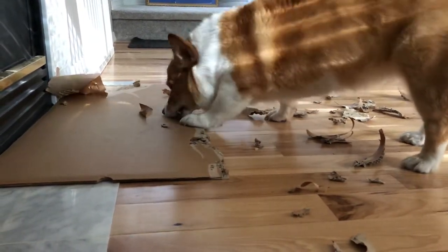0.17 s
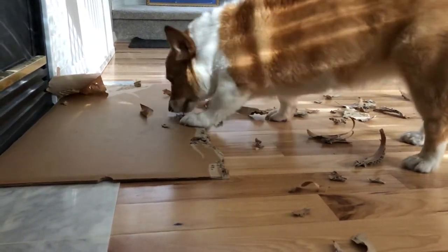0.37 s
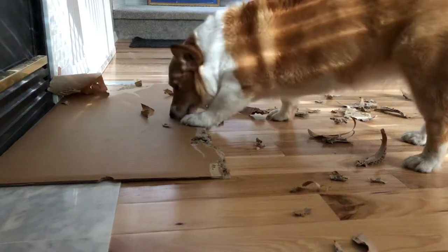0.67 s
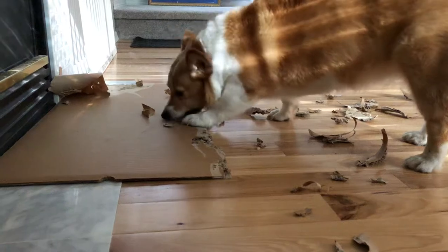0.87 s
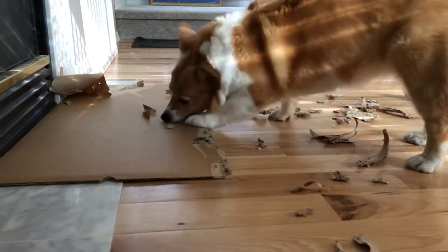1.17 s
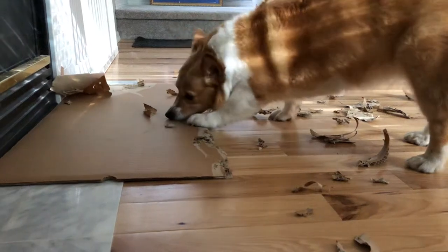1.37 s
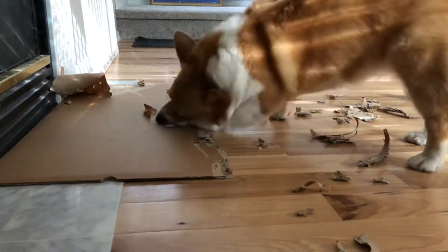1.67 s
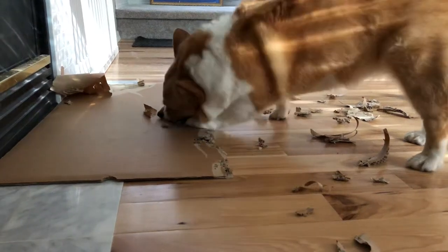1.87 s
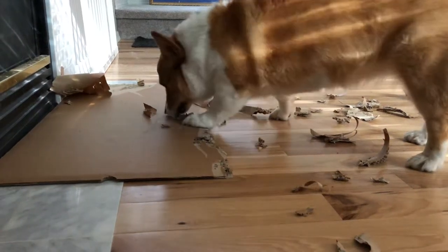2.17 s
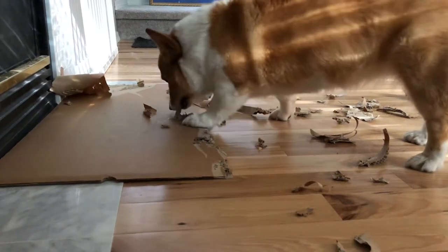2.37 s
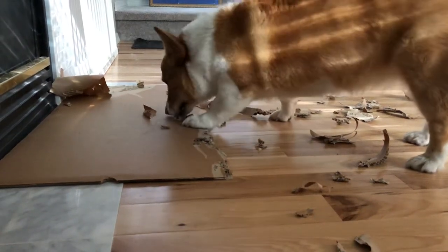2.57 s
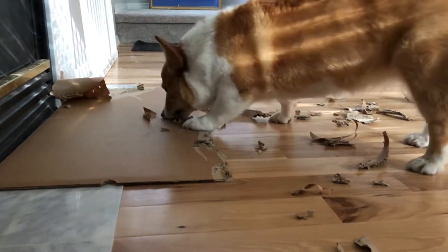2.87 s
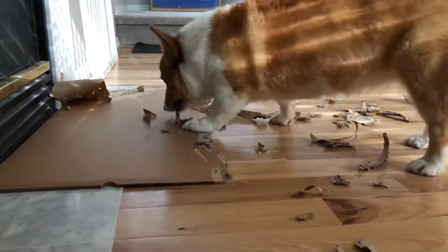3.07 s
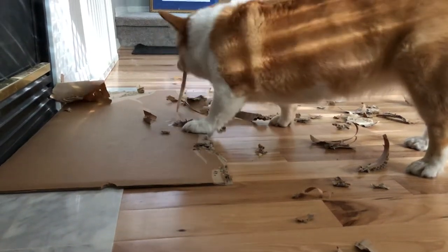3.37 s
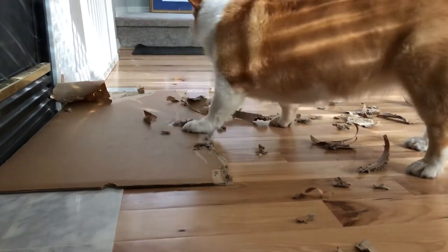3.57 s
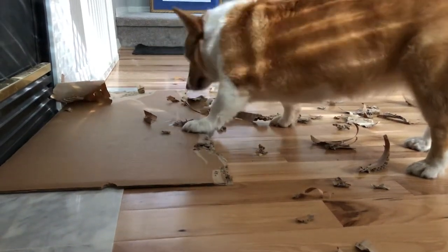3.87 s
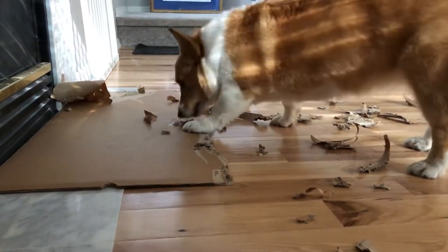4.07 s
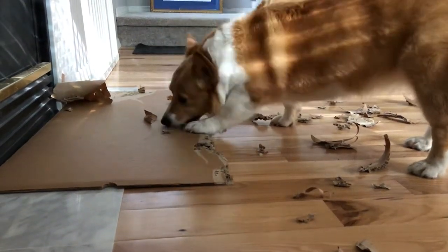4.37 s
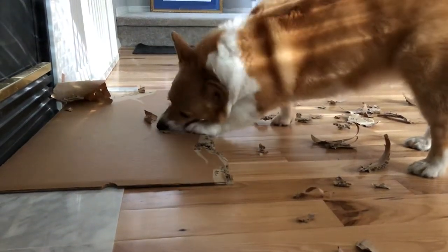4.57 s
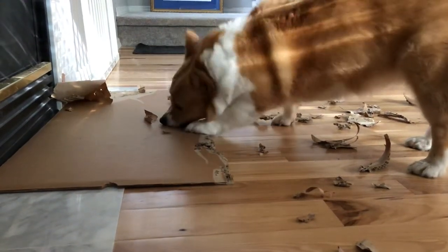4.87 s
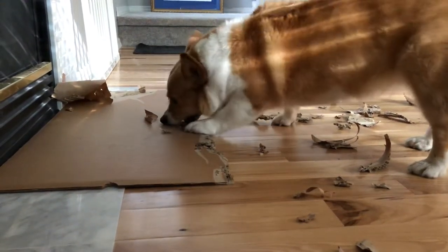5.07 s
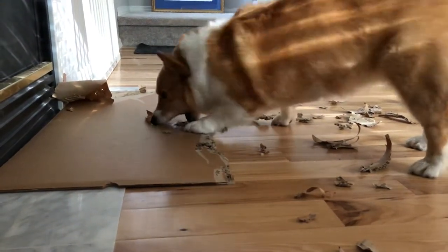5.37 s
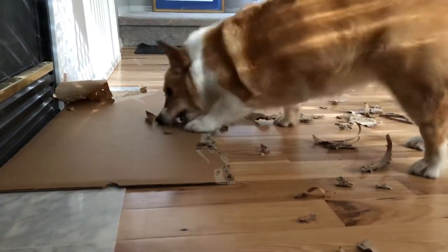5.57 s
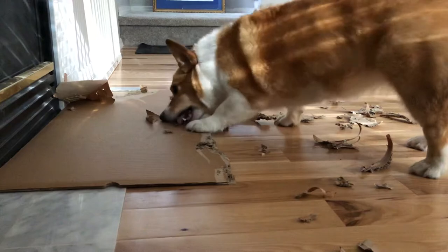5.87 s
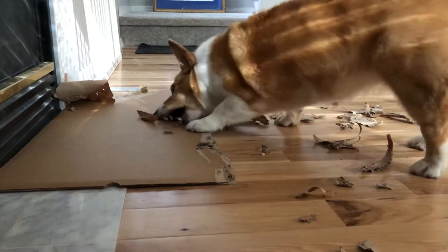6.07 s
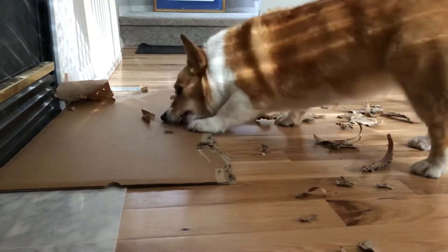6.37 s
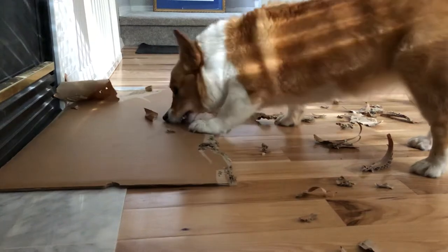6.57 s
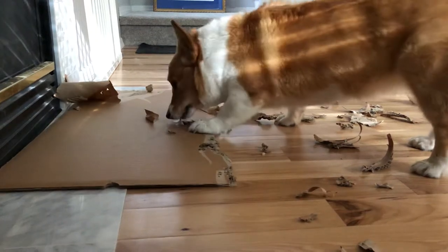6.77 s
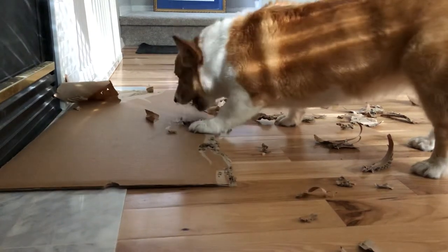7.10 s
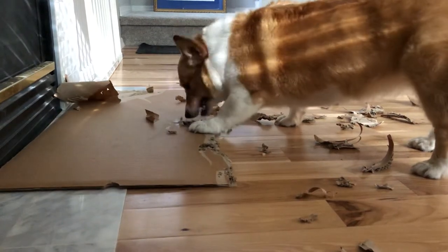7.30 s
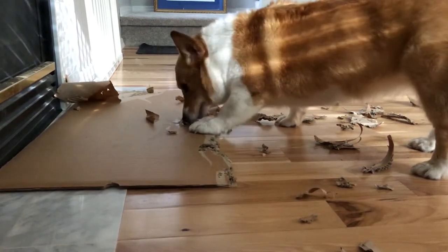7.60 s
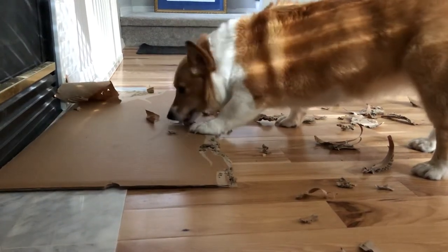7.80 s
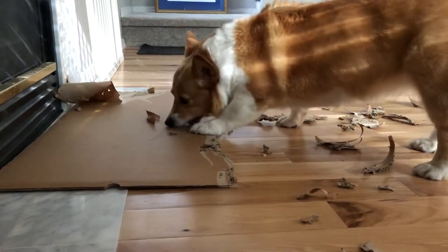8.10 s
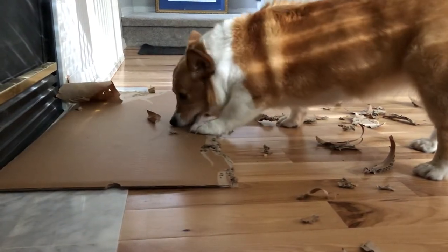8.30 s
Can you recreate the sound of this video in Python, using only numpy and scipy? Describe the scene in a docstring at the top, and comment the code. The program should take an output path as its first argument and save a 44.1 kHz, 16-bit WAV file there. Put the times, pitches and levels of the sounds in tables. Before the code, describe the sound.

Close up, a dog bites and tears a cardboard sheet on a wooden floor. Quick growing rips open the scene, then more pulls with crunches and low thuds around two and three seconds. A quieter stretch of small nudges follows. Near six seconds one very sharp snap stands out, then ripping fades to faint ticks and a last small tear. The bare room rings lightly over low hum.

```python
"""Cardboard tearing: a dog grips a flat sheet on a wooden floor and rips strips off it, pausing between pulls.
Rips are dense random breaks, spectrally shaped for the fibres and passed through modes for the hollow sheet.
Snaps and crunches are short pitched noise bursts that also knock the sheet; thuds are decaying sines.
A bare room rings through sparse random taps; the house hum is shaped noise with a few fuzzy tones."""
import sys
import numpy as np
from scipy import signal
from scipy.io import wavfile
from scipy.ndimage import uniform_filter1d

SR = 44100
rng = np.random.default_rng(int(sys.argv[2]) if len(sys.argv) > 2 else 0)


def wav_record(signal):
    """Record a signal, one row per channel, as 16-bit PCM in the file named by sys.argv[1]."""
    frames = np.transpose(np.atleast_2d(signal))
    bounded = np.clip(frames, -1, 1)
    # unit amplitude maps onto the largest positive 16-bit level
    quanta = np.round(bounded * 32767).astype(np.int16)
    wavfile.write(sys.argv[1], SR, quanta)


N = 372204  # samples

# pulls, tension growing or easing: start_s, end_s, first_db, last_db, sheet_rel_db
PULLS = [(0, 0.131, -50, -47.5, -8), (0.155, 0.297, -60, -37.5, -6.5), (0.306, 0.359, -29, -30.5, -2.5),
         (1.17, 1.415, -51, -42.5, -9), (1.503, 1.62, -59, -71, 11), (1.799, 2.19, -47, -41.5, -9.5),
         (2.181, 2.296, -36.5, -35.5, -2.5), (2.948, 3.086, -67, -40, 1), (3.09, 3.154, -44.5, -46.5, 2.5),
         (3.162, 3.357, -39, -33.5, -4.5), (3.406, 3.524, -41, -35, -8.5), (3.615, 3.74, -61.5, -68, 4),
         (4.751, 5.018, -58, -50.5, -1.5), (5.539, 5.78, -47.5, -51.5, -11),
         (6.157, 6.207, -45.5, -55.5, -4), (6.23, 6.46, -42, -59, -3), (6.436, 6.723, -54.5, -38, -3.5),
         (6.729, 6.893, -38, -56, 2), (8.34, 8.439, -48, -42, -1.5)]
# muzzle and paws nudging the sheet between pulls: time_s, level_db
NUDGES = [(0, -51.5), (.71, -71), (.94, -61), (1.17, -68), (1.67, -62), (2.42, -56.5), (2.55, -76),
          (2.78, -73), (2.9, -63.5), (3.9, -84), (4.1, -78.5), (4.42, -64.5), (4.75, -68), (5.17, -60),
          (5.29, -68.5), (5.5, -59), (6.03, -59.5), (6.15, -65), (7.0, -78), (7.49, -81), (7.63, -63.5),
          (7.78, -71.5), (8.06, -65), (8.2, -77), (8.34, -63)]
NUDGE_SHEET_REL_DB = -4.5
DEBRIS_DB, DEBRIS_DB_PER_S = -19.5, 95  # loose fibres trail off after a pull
SETTLE_DB, SETTLE_DB_PER_S = -4, 130.5  # the released sheet shakes itself still
# rip spectrum, relative: freq_hz, density_db_per_hz
FIBRE_SPECTRUM = [(710, -39), (1200, -4), (2680, 2), (3220, -0.5), (6650, -1.5), (7330, -3.5), (8630, -4),
                  (14500, -14), (16000, -13.5)]
# thin skin rips brighter: time_s, extra_treble_db
SKIN_TREBLE = [(0, -7), (2.6, -35), (3.0, 11), (3.7, -10), (4.3, -16.5), (8.44, 0)]
# modes of the hollow sheet: freq_hz, width_hz (of each of two passes), gain_db
SHEET_MODES = [(369, 100, -4.5), (543, 145, -0.5), (684.4, 56, 4.5), (755, 82, 4.5), (858, 130, 3.5),
               (1004.7, 210, 0), (1132, 217, 0), (1305, 380, -2), (1497, 290, -9.5), (1674, 1000, -12.5)]

# snaps of fibre, clicks of teeth: start_s, tone_peak_db, knock_rel_db (before KNOCK_LIFT_DB), pitch_hz, t60_s
SNAPS = [(0.1151, -25, -28, 4030, 0.016), (0.6958, -47.5, -23, 3640, 0.054), (1.1503, -42, -1, 3000, 0.078),
         (1.3394, -20.5, -17.5, 6400, 0.042), (1.4945, -34.5, 4.5, 2800, 0.036),
         (1.5284, -35, 5, 5600, 0.046), (1.8607, -14, -37, 7000, 0.022), (2.1864, -19.5, -18, 7600, 0.039),
         (2.1936, -19.5, -13, 8100, 0.064), (2.3646, -34, -11, 9500, 0.027), (2.5292, -36, 5, 2370, 0.013),
         (2.5521, -43, -5, 2380, 0.032), (2.5985, -44, 3, 5430, 0.027), (2.655, -49, 2, 6200, 0.045),
         (2.8589, -46, -12, 12000, 0.03), (2.9267, -31.5, -12, 5800, 0.056),
         (2.9537, -32, -13, 8310, 0.017), (3.0651, -36, -20, 7800, 0.03), (3.1288, -26.5, -16, 6000, 0.078),
         (3.6132, -31.5, -10, 2330, 0.098), (3.84, -51, -9, 2720, 0.026),
         (4.5456, -47.5, 15.5, 3250, 0.0087), (5.3453, -26.5, -17.5, 6040, 0.026),
         (5.7743, -25, -10, 3230, 0.042), (5.9115, -48, 9.5, 2900, 0.052),
         (6.1579, -37.5, -18.5, 3000, 0.05), (6.2034, -11, -18.5, 9000, 0.048),
         (6.2088, 0, -15, 7600, 0.023), (6.2804, -20, -35, 12000, 0.024), (6.4023, -28, -17, 5470, 0.061),
         (6.4494, -45, 13, 2000, 0.023), (6.8763, -33.5, -4, 4050, 0.06), (7.205, -53, -25, 13500, 0.02),
         (7.2654, -55, 9, 2466, 0.034), (7.4974, -47.5, -16, 3330, 0.027), (7.5916, -51, -22, 12000, 0.03),
         (7.9394, -44.5, -1, 4200, 0.07), (8.1534, -46.5, -12, 2970, 0.035)]
# rounded crunches of a bite: start_s, tone_peak_db, knock_rel_db (before KNOCK_LIFT_DB), pitch_hz, length_s
CRUNCHES = [(0.047, -36.5, -8, 3200, 0.044), (0.199, -42, -0.5, 2000, 0.018), (0.744, -64, 7, 2030, 0.025),
            (1.205, -29.5, -26, 7530, 0.0076), (1.235, -24.5, -15.5, 5100, 0.023),
            (1.392, -30.5, -6, 3770, 0.012), (1.807, -36, -14, 5900, 0.015),
            (1.9375, -31, -28, 5150, 0.015), (2.0276, -25, -9, 6500, 0.025), (2.092, -28, -25, 7300, 0.022),
            (2.425, -35.5, -5, 7100, 0.023), (3.295, -36, 2, 1990, 0.056), (4.267, -47, -12, 2760, 0.049),
            (4.7734, -39, -7.5, 4840, 0.033), (4.9585, -34, -17, 8500, 0.0087),
            (5.005, -40, -21, 4470, 0.018), (5.499, -40, -1.5, 3200, 0.015),
            (5.582, -29, -14.5, 7100, 0.023), (5.612, -26, -17, 4840, 0.021),
            (5.707, -33.5, -31.5, 8000, 0.032), (6.2426, -27, -13.5, 5700, 0.014),
            (6.263, -22, -12, 5140, 0.014), (6.548, -30.5, -11.5, 2960, 0.026),
            (6.702, -21, -5, 6230, 0.038), (6.736, -24, -11, 2960, 0.021), (7.038, -60, 11, 2005, 0.026),
            (7.117, -62.5, 16.5, 2370, 0.016), (7.17, -66, 8, 1974, 0.03), (7.33, -72, 10, 2000, 0.018),
            (7.5068, -50.5, 3.5, 3420, 0.017), (7.699, -54.5, 0.5, 3270, 0.04),
            (8.161, -46.5, -1.5, 7000, 0.029), (8.205, -42.5, -6.5, 5000, 0.042),
            (8.345, -31, -14, 6500, 0.061)]
FIZZ_DB, CRACK_DB, KNOCK_LIFT_DB = -23.5, -2, 9.5
DULL_HZ, DULL_DB_PER_OCTAVE = 3000, 70  # pitched below this, a bite loses fizz and crack

# paws and chest on the boards: start_s, level_db (before onset and decay), pitch_hz, t60_s
THUDS = [(0.326, -33.5, 91, 0.11), (1.336, -39, 151, 0.17), (1.784, -35.5, 92, 0.24),
         (1.814, -32, 117, 0.18), (1.849, -35.5, 62, 0.28), (2.051, -25.5, 142, 0.042),
         (2.199, -33, 115, 0.1), (5.519, -32, 99, 0.2), (5.554, -33, 109, 0.16), (5.598, -34, 93, 0.15)]

# room ring by band: freq_hz, t60_s, rel_db
ROOM_BANDS = [(250, 0.34, -17), (810, 0.93, 3), (2050, 0.72, 1), (5560, 0.75, -5.5), (12000, 0.27, -4)]
ROOM_DB = -10.5

# house hum spectrum, relative: freq_hz, density_db_per_hz
HUM_SPECTRUM = [(19, -51), (32, -31), (77, 1.5), (191, 3), (211, -1.5), (247, -14.5), (383, -26.5),
                (472, -32), (551, -22), (791, -35.5), (973, -35.5), (2670, -61.5), (6110, -42.5),
                (15500, -48)]
HUM_RMS_DB = -52
# fuzzy tones in the hum: freq_hz, width_hz, rms_db
HUM_TONES = [(85.9, 12, -55.5), (160, 14, -62.5), (269.7, 4.1, -68.5), (576, 8.4, -79)]

EDGE_HZ = 15850  # upper band limit


def tearing():
    """Fibres part with a bright crackle; the same breaks shake the hollow sheet."""
    t_s = np.arange(N) / SR
    fibre_db, flex_db = tugs(t_s)
    fibre_gain = uniform_filter1d(gain_of(fibre_db), size=400)
    flex_gain = uniform_filter1d(gain_of(flex_db), size=400)

    slack = np.clip((-29 - fibre_db) / 15, 0, 1)  # a hard pull runs evenly, a weak one stutters
    breaks = crackle(per_s=14000, spread_db=2.5, clump_db=0.46, jerk_db=2.8 * slack)

    rip = coloured(breaks, FIBRE_SPECTRUM, size=256, patchy_db=3.5)
    treble_gain = gain_of(np.interp(t_s, *np.transpose(SKIN_TREBLE)))
    rip += treble_gain * resonate(rip, 12000, 9000)

    # flat spectrum: only the patches act, so the ring wanders from mode to mode as the sheet bends
    sheet = coloured(hollow(breaks), [(1, 0), (SR, 0)], size=512, patchy_db=4.5)
    return fibre_gain * rip + flex_gain * sheet


def tugs(t_s):
    """Fibre and sheet levels in dB: the loudest of nudges, pulls and their trails."""
    fibre_db = np.interp(t_s, *np.transpose(NUDGES))
    flex_db = fibre_db + NUDGE_SHEET_REL_DB
    for start_s, end_s, first_db, last_db, sheet_rel_db in PULLS:
        tension_db = np.interp(t_s, [start_s, end_s], [first_db, last_db])
        pull_db = np.where(t_s < start_s, -np.inf, tension_db)
        after, since_s = t_s > end_s, t_s - end_s
        debris_db = after * (DEBRIS_DB - DEBRIS_DB_PER_S * since_s)
        settle_db = after * (SETTLE_DB - SETTLE_DB_PER_S * since_s)
        fibre_db = np.maximum(fibre_db, pull_db + debris_db)
        flex_db = np.maximum(flex_db, pull_db + sheet_rel_db + settle_db)
    return fibre_db, flex_db


def crackle(per_s, spread_db, clump_db, jerk_db):
    """Tiny breaks of uneven size, in clumps of a few milliseconds and slower jerks."""
    broken = rng.random(N) < per_s / SR
    size = np.minimum(rng.exponential(1, N), 4)
    sign, clump, jerk = rng.standard_normal((3, N))  # sign also varies the size
    clump = evened(uniform_filter1d(clump, size=120))
    jerk = evened(uniform_filter1d(jerk, size=700))
    level_db = spread_db * size + clump_db * clump + jerk_db * jerk
    return evened(sign * broken * gain_of(level_db))


def hollow(x):
    """Sheet modes in parallel, each resonated twice for steep skirts."""
    out = 0
    for freq_hz, width_hz, gain_db in SHEET_MODES:
        once = resonate(x, freq_hz, width_hz)
        out = out + gain_of(gain_db) * resonate(once, freq_hz, width_hz)
    return out


def bites(events, envelope):
    """Each bite is an enveloped noise burst with its own pitch and fizz; it also knocks the sheet."""
    t_s, bright, knock = np.arange(5000) / SR, np.zeros(N), np.zeros(N)
    for start_s, peak_db, knock_rel_db, pitch_hz, span_s in events:
        burst = rng.standard_normal(len(t_s)) * envelope(t_s, span_s)
        dull_db = DULL_DB_PER_OCTAVE * min(np.log2(pitch_hz / DULL_HZ), 0)
        crack = gain_of(CRACK_DB + dull_db) * resonate(burst, 3200, 5000)
        width_hz = 0.44 * pitch_hz
        pitched = resonate(resonate(burst, pitch_hz, width_hz), pitch_hz, width_hz)
        tone = above(crack + 0.74 * pitched, 1700)
        fizz = gain_of(FIZZ_DB + dull_db) * above(burst, 8300)
        add(bright, start_s, gain_of(peak_db) * (tone / abs(tone).max() + fizz))
        add(knock, start_s, gain_of(peak_db + knock_rel_db + KNOCK_LIFT_DB) * burst)
    return bright + hollow(knock)


def snap(t_s, t60_s):
    """Snap envelope: one hard break, then an exponential trail."""
    t_s = np.maximum(t_s - .0006, 0)
    onset = 1 - np.exp(-t_s / .0001)
    trail = gain_of(-60 * t_s / max(t60_s, .004))
    return onset * (1.4 * np.exp(-t_s / 0.00047) + trail)


def crunch(t_s, length_s):
    """Crunch envelope: a quick swell that fades as the corrugation collapses."""
    u = 3 * t_s / max(length_s, .003)  # peaks at u = 1
    return u * np.exp(1 - u)


def thuds():
    """Weight on the boards: a softly started low sine dying exponentially."""
    t_s, out = np.arange(SR // 2) / SR, np.zeros(N)
    for start_s, level_db, pitch_hz, t60_s in THUDS:
        onset = 1 - np.exp(-t_s / 0.0027)
        decay = gain_of(level_db - 60 * t_s / t60_s)
        add(out, start_s, decay * onset * np.sin(2 * np.pi * pitch_hz * t_s))
    return out


def room(x):
    """Sparse taps of random sign, one per 20 samples, each band dying at its own rate."""
    taps = np.zeros(SR)
    starts = np.arange(240, SR - 20, 20)
    taps[starts + rng.integers(0, 20, len(starts))] = rng.choice([-1., 1.], len(starts))

    freq_hz, t_s, z = signal.stft(taps, SR, nperseg=256)
    t60_s = read([(hz, t60) for hz, t60, _ in ROOM_BANDS], freq_hz)[:, None]
    band_db = read([(hz, db) for hz, _, db in ROOM_BANDS], freq_hz)[:, None]
    decay_db = -60 * t_s / t60_s
    flat = signal.istft(z * gain_of(decay_db), SR, nperseg=256)[1]
    tail = signal.istft(z * gain_of(band_db + decay_db), SR, nperseg=256)[1]

    rise = 1 - np.exp(-np.arange(len(tail)) / SR / 0.0064)  # far walls: the ring builds up late
    return signal.fftconvolve(x, rise * tail / np.linalg.norm(rise * flat))[:N]


def house():
    """Low rumble and faint hiss from shaped noise; fuzzy tones from resonated noise."""
    out = gain_of(HUM_RMS_DB) * coloured(rng.standard_normal(N), HUM_SPECTRUM, size=2048, patchy_db=0.9)
    for freq_hz, width_hz, rms_db in HUM_TONES:
        out += gain_of(rms_db) * evened(resonate(rng.standard_normal(N), freq_hz, width_hz))
    return out


def gain_of(db):
    """Amplitude ratio from dB."""
    return 10 ** (np.asarray(db) / 20)


def evened(x):
    """Scales to unit RMS."""
    return x / np.sqrt(np.mean(x ** 2) + 1e-20)


def read(points, freq_hz):
    """Interpolates a table over log frequency."""
    table_hz, value = np.transpose(points)
    return np.interp(np.log(freq_hz + 1), np.log(table_hz + 1), value)


def add(mix, start_s, sound):
    """Mixes a sound in place, cut at the end of the mix."""
    part = mix[round(start_s * SR):][:len(sound)]
    part += sound[:len(part)]


def resonate(x, freq_hz, width_hz):
    """Two-pole resonance, gain about 1 at its centre."""
    r, w = np.exp(-np.pi * width_hz / SR), 2 * np.pi * freq_hz / SR
    return signal.lfilter([(1 - r * r) / 2, 0, (r * r - 1) / 2], [1, -2 * r * np.cos(w), r * r], x)


def above(x, cutoff_hz):
    """Fourth-order Butterworth high-pass."""
    return signal.sosfilt(signal.butter(4, cutoff_hz, "high", fs=SR, output="sos"), x)


def coloured(x, spectrum, size, patchy_db):
    """Shapes short-time spectra, with patches drifting in time and pitch; unit RMS out."""
    freq_hz, _, z = signal.stft(x, SR, nperseg=size, noverlap=size * 3 // 4)
    patches = rng.standard_normal(z.shape)
    patches = uniform_filter1d(patches, size=2, axis=0)  # over pitch
    patches = evened(uniform_filter1d(patches, size=20, axis=1))  # over time
    z = z * gain_of(read(spectrum, freq_hz)[:, None] + patchy_db * patches)
    return evened(signal.istft(z, nperseg=size, noverlap=size * 3 // 4)[1][:N])


def scene():
    """Dog and cardboard, dry and through the room, plus thuds and house hum."""
    dog = tearing() + bites(SNAPS, snap) + bites(CRUNCHES, crunch)
    return (dog + gain_of(ROOM_DB) * room(dog) + thuds() + house())[None]


def record(dry):
    """The converter clips just under full scale; a linear-phase low-pass then limits the band."""
    clipped = np.clip(dry, -.95, .95)
    lowpass = signal.firwin(511, EDGE_HZ, window=("kaiser", 9), fs=SR)
    return signal.oaconvolve(clipped, lowpass[None], "same")


dry = scene()
out = record(dry)
wav_record(out)
```